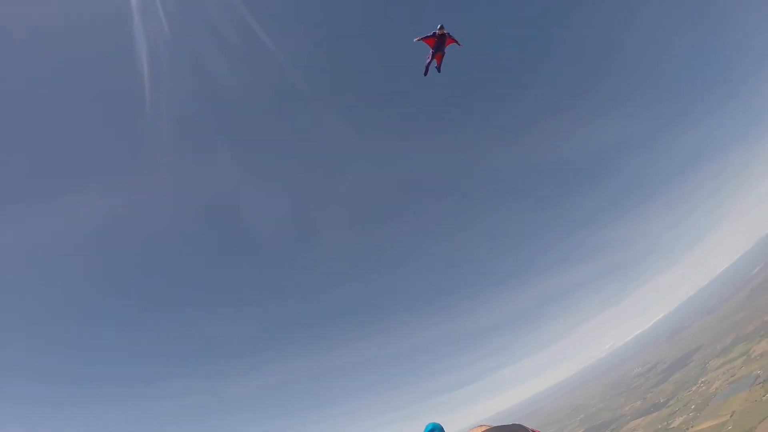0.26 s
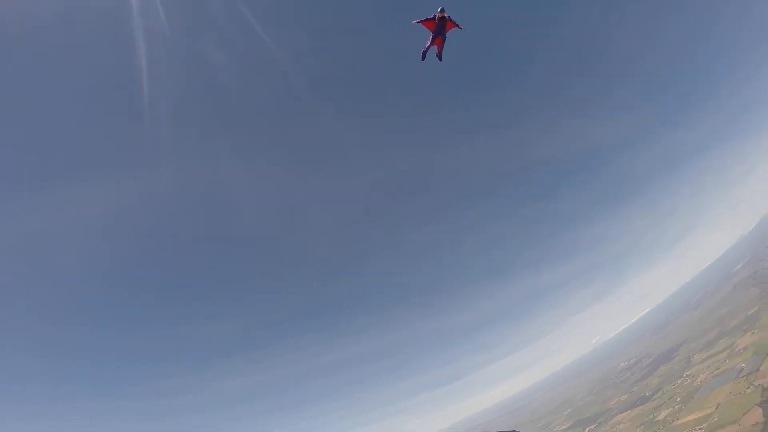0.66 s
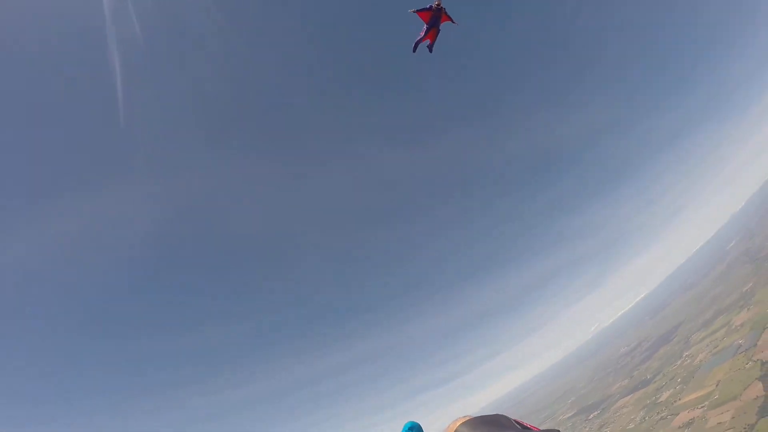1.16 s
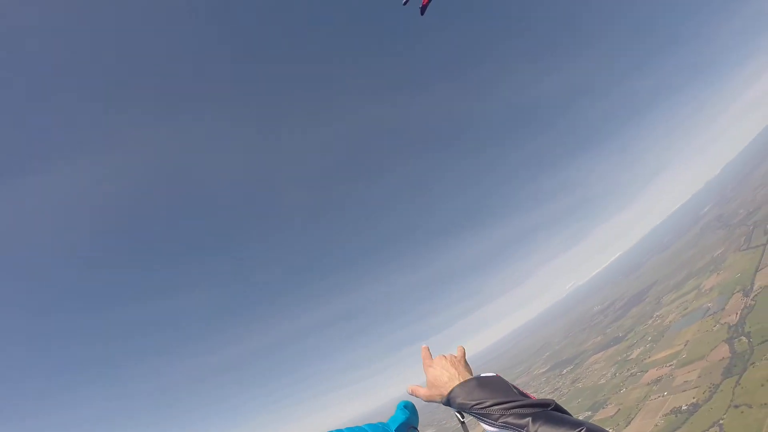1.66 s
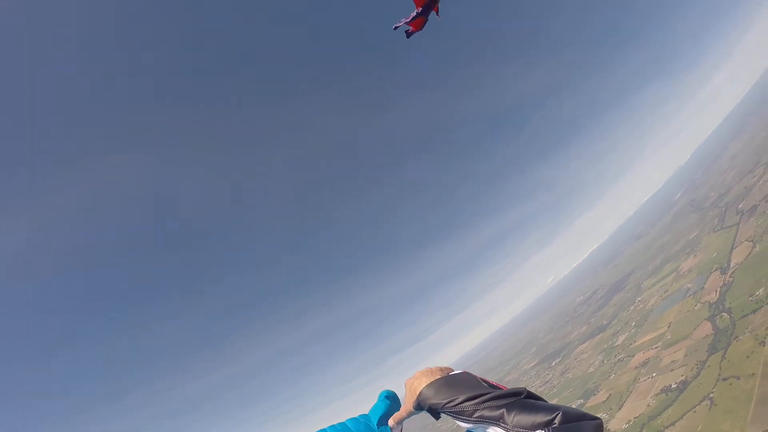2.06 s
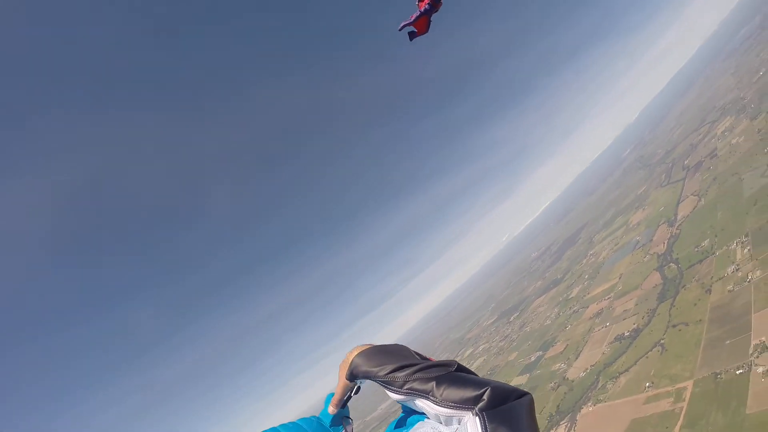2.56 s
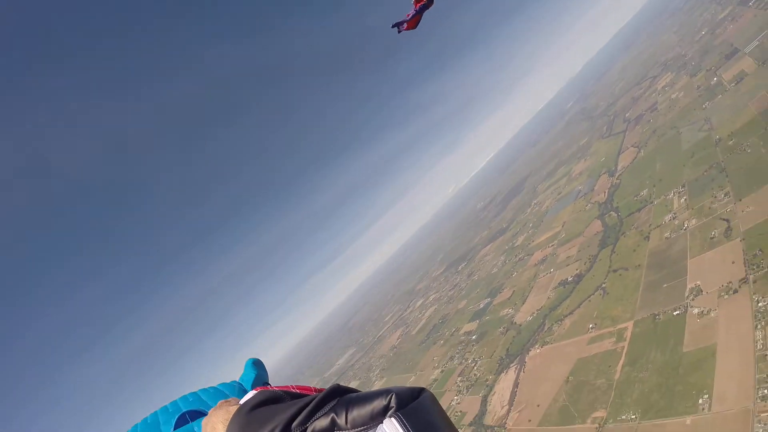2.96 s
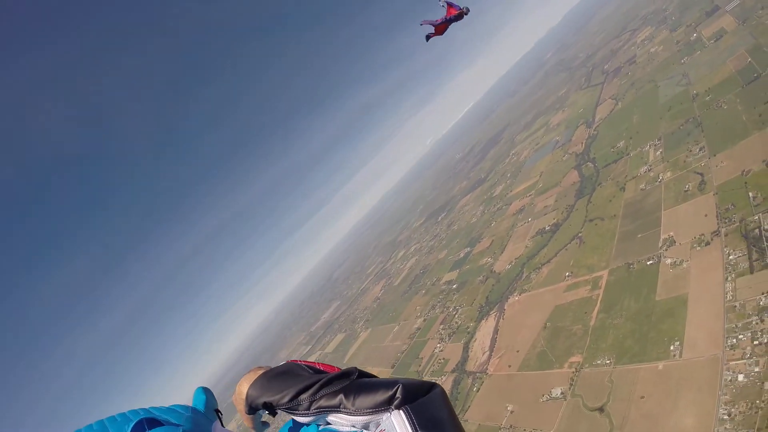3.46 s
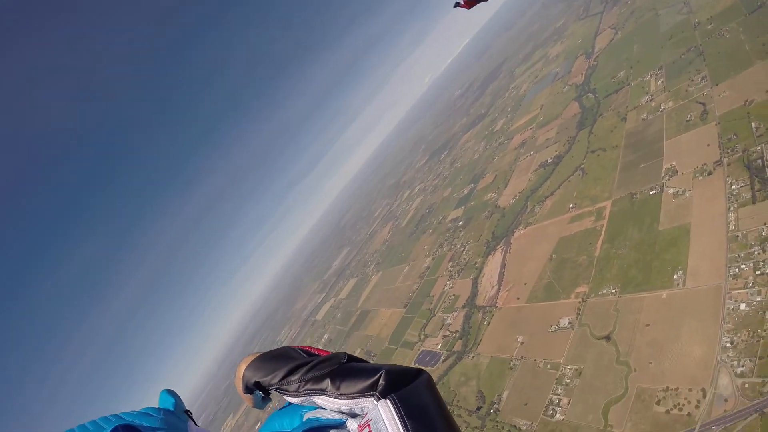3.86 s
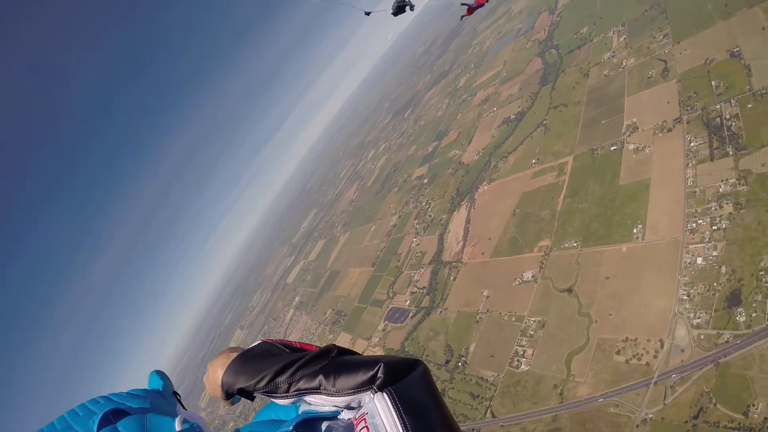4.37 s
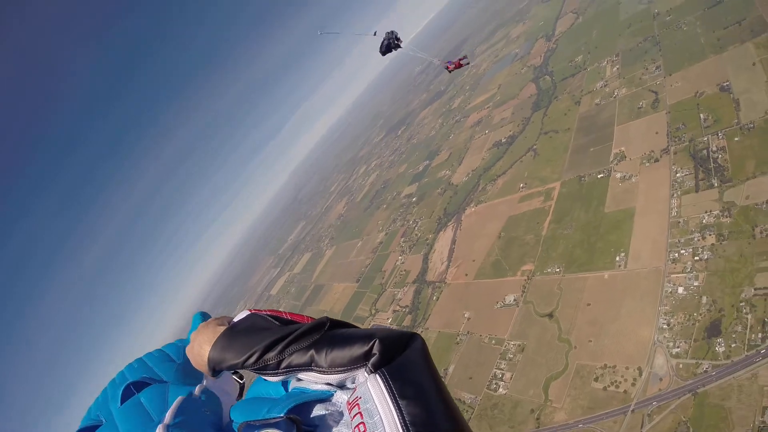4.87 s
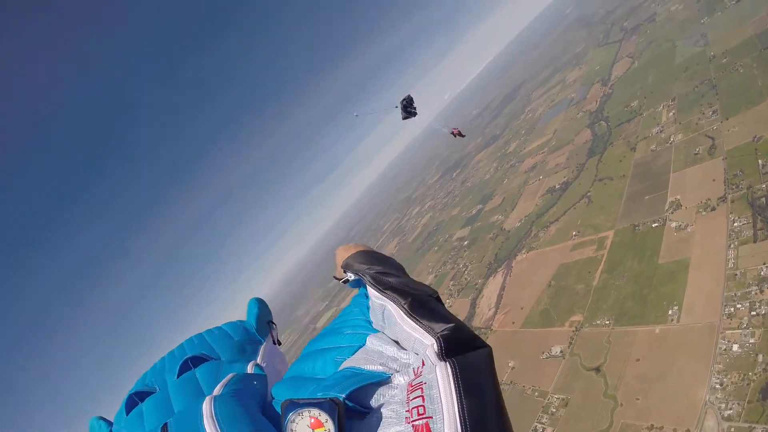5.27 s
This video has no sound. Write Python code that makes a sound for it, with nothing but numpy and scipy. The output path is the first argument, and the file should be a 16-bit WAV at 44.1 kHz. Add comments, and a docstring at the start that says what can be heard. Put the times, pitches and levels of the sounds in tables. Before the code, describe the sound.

Continuous airstream noise from a wingsuit flight, very close and dry, mono, with overloaded peaks squashed. The first two seconds are heavy: low boom, rough crackling flurries, blunt thumps and a steady airy rush. Then the head turns and air catches a gap, adding a strong breathy hiss, hollow at first and then brighter. Low rumble thins out with occasional soft gusts; nothing else is heard.

```python
"""Wingsuit flight heard from a helmet camera. Eddies buffet the housing with a deep boom, a broad rumble and
a fluttering roar, while air rushes over its openings. In the first two seconds the roar breaks into flurries
and big eddies thump, the hardest making the camera's limiter duck for a moment. At 2.1 s, as the head turns,
the airstream catches a gap: a loud, hollow hiss and a thin top from its lip join in while the buffeting eases.
The rush fades from 3 to 4.2 s. Each source is noise shaped by resonances or a broad spectrum, moved in level."""
import sys
import numpy as np
from scipy import signal
from scipy.fft import rfft, irfft
from scipy.io import wavfile
from scipy.ndimage import uniform_filter1d

SR = 44100
rng = np.random.default_rng(int(sys.argv[2]) if len(sys.argv) > 2 else 0)


def wrap_up_sound(samples):
    """Save the sound to the file named by the first command line argument, as 16-bit audio."""
    columns = np.atleast_2d(samples).T
    # keep every value between -1 and 1, then stretch to whole-number steps
    tamed = np.clip(columns, -1, 1)
    steps = np.round(tamed * 32767).astype(np.int16)
    wavfile.write(sys.argv[1], SR, steps)


N = 243381
TIME = np.arange(N) / SR  # s
FREQ = np.maximum(np.arange(N // 2 + 1) * SR / N, 1)  # Hz

# Strength of the buffeting before trim: t/s, deep boom level/dB, broad rumble level/dB
BUFFET_LEVELS = [(0, -18.5, -27.5), (.9, -17, -27.5), (1.1, -14, -29.5), (1.48, -15, -26),
                 (1.7, -17.5, -29), (2.1, -15.5, -29.5), (2.42, -22.5, -31.5), (3.2, -26, -34.5),
                 (3.9, -29, -34), (4.15, -27, -30.5), (4.7, -34, -31.5), (5.52, -25.5, -31)]
# Single gusts and lulls in the deep boom: t/s, level change/dB
BOOM_GUSTS = [(0.97, -8), (1.27, -6), (2.09, 4.5), (2.47, -4), (2.57, 6), (2.81, 7.5), (3.05, 5.5),
              (3.85, -5), (4.42, 9)]
# Big eddies that thump the housing: t/s, peak pressure level/dB ahead of the limiter
THUMP_EVENTS = [(0.2, -3), (1.225, 1.5), (1.532, -1), (1.623, -1), (1.692, -2), (1.884, -4.5)]
# Deep resonances of the buffeted housing: f/Hz, width/Hz, relative level/dB
BOOM_MODES = [(68.6, 27, -10), (84.8, 12.6, 0), (104, 21.3, -2)]
# Resonance of the housing above the deep boom: f/Hz, width/Hz, relative level/dB
UPPER_BOOM_MODES = [(152, 49, 0)]
# Broad spectrum of the rumble: f/Hz, relative level/dB
RUMBLE_SPECTRUM = [(10, -9), (22, 5), (35, 2), (70, 5), (130, 2.5), (205, 4), (260, 0.5), (400, -3.5),
                   (520, -7.5), (700, -10), (1200, -27), (4000, -50)]
# Strength of the midrange roar before trim: t/s, level/dB
ROAR_LEVELS = [(0, -31.0), (0.6, -31), (1.7, -30.5), (3.05, -32.5), (3.12, -37), (3.9, -33.5), (4.3, -29),
               (5.52, -31)]
# Midrange resonances of the buffeted housing: f/Hz, width/Hz, relative level/dB
ROAR_MODES = [(783, 65, -1), (918, 420, -2.5), (1282, 290, -4.5)]
# Short flurries in the roar: t/s, level at the height of the flurry/dB
FLURRY_EVENTS = [(0.11, -25), (0.314, -22), (0.494, -22), (0.589, -16), (0.633, -17.5), (0.792, -22.5),
                 (0.846, -18.5), (1.07, -23), (1.311, -22), (1.511, -20.5)]
# Broad spectrum of a flurry: f/Hz, relative level/dB
FLURRY_SPECTRUM = [(100, -8), (300, -2), (550, -6), (850, 1.5), (1600, -2), (2500, -22), (5000, -34)]
# Air rushing over the housing, before trim: t/s, level/dB
RUSH_LEVELS = [(0, -22), (.9, -19), (1.53, -21), (1.56, -24), (1.8, -21.5), (3, -21.5), (4.2, -36)]
# Air resonances of the housing: f/Hz, width/Hz, relative level/dB driven by the rush, the same by the gap
CAVITY_MODES = [(650, 250, -29, -15.5), (1540, 460, -3, -3.5), (1790, 590, -1.5, -10.5),
                (2402, 500, -1, -6.5), (2700, 350, -0.5, -7), (2987, 296, -2.5, 0), (3310, 565, -2, 1),
                (3840, 1200, -14.5, -36), (4430, 490, -8.5, -14.5), (4587, 154, -21, -8.5),
                (4820, 360, -11, -33), (5260, 240, -12, -21), (5640, 480, -10.5, -16),
                (6060, 300, -15.5, -17.5), (6610, 870, -15.5, -24), (7510, 1020, -12.5, -27),
                (8720, 1120, -15.5, -36), (9640, 910, -16, -25), (10270, 1040, -17.5, -33),
                (11640, 1400, -20, -30), (12440, 920, -19, -27), (14400, 1800, -29, -53)]
# Thin hiss at the lip of the gap: t/s, level/dB
LIP_LEVELS = [(2.12, -60), (2.25, -40), (2.46, -32), (3.04, -33.5), (3.12, -39), (3.85, -38), (4.25, -44)]
# Lowest resonance of the lip: f/Hz, width/Hz, relative level/dB
LIP_LOW_MODES = [(5310, 640, 0)]
# Higher resonances of the lip: f/Hz, width/Hz, relative level/dB
LIP_HIGH_MODES = [(8250, 620, -2), (9680, 620, 1.5), (10170, 500, -1.5), (11200, 1400, -8),
                  (12400, 1000, -10), (14400, 1800, -22)]

CATCH_S = 2.112  # the stream catches the gap


def undb(db):
    """Decibels to gain."""
    return 10 ** (np.asarray(db) / 20)


def curves(table):
    """Each level column of a table as a line through time."""
    times, *columns = np.transpose(table)
    return [np.interp(TIME, times, column) for column in columns]


def resonances(modes):
    """Gain per frequency of a set of steep-sided resonances, summed in power."""
    power = 0
    for hz, width_hz, db in modes:
        detuning = (FREQ - hz ** 2 / FREQ) / width_hz
        power = power + (undb(db) / (1 + detuning ** 2)) ** 2
    return np.sqrt(power)


def spectrum(points):
    """Gain per frequency of a broad spectrum, joined by lines in dB over log frequency."""
    hz, db = np.transpose(points)
    return undb(np.interp(np.log(FREQ), np.log(hz), db))


def turbulence(gain):
    """Random pressure through a frequency response, rms 1."""
    pressure = irfft(rfft(rng.standard_normal(N)) * gain, N)
    return pressure / np.std(pressure)


def walk(rate_hz):
    """Smooth random wander, mostly slower than rate_hz, spread 1."""
    return turbulence(1 / (1 + (FREQ / rate_hz) ** 4))


def sustain(x, span_s):
    """A steady airstream keeps feeding the eddies, so their power evens out over span_s."""
    power = uniform_filter1d(x ** 2, max(int(span_s * SR), 2))
    return x / np.sqrt(power + 1e-9)


def swell(at_s, width_s):
    """A bell-shaped swell in time, peak 1."""
    return np.exp(-0.5 * ((TIME - at_s) / width_s) ** 2)


def buffeting(boom_trim_db=0.74, rumble_trim_db=2.0, gust_width_s=0.035):
    """Shed eddies shake the housing's low resonances over a broad rumble, in random surges."""
    boom_db, rumble_db = curves(BUFFET_LEVELS)
    gust_db = sum(db * swell(at_s, gust_width_s) for at_s, db in BOOM_GUSTS)
    boom = sustain(turbulence(resonances(BOOM_MODES)), span_s=0.093)
    boom = boom * undb(boom_db + gust_db + boom_trim_db)

    # the eddies of boom and rumble both feed the upper boom: mean level in dB, then dB per dB
    upper_db = -29 + 0.48 * (boom_db - boom_db.mean()) + 1.85 * (rumble_db - rumble_db.mean())
    upper = sustain(turbulence(resonances(UPPER_BOOM_MODES)), span_s=0.14) * undb(upper_db)

    rumble = sustain(turbulence(spectrum(RUMBLE_SPECTRUM)), span_s=0.051)
    rumble = rumble * undb(rumble_db + rumble_trim_db + 0.82 * walk(rate_hz=40))

    surge_db = 1.0 * walk(rate_hz=4.2)
    return thumps((boom + upper + rumble) * undb(surge_db))


def thumps(pressure, thump_s=0.002):
    """A big eddy sweeps the small ones aside and passes as suction, pressure peak, suction."""
    for at_s, db in THUMP_EVENTS:
        push = (1 - ((TIME - at_s) / thump_s) ** 2) * swell(at_s, thump_s)
        swept = pressure * (1 - swell(at_s, 2 * thump_s))
        pressure = swept + undb(db) * push
    return pressure


def roar(roar_db, flutter, trim_db=1.5, flurry_width_s=0.0042):
    """Smaller eddies flutter in the midrange and now and then tear off in a broad flurry."""
    steady_db = roar_db + trim_db + 0.6 * flutter + 1.0 * walk(rate_hz=26)
    steady = turbulence(resonances(ROAR_MODES)) * undb(steady_db)
    flurry_gain = sum(undb(db) * swell(at_s, flurry_width_s) for at_s, db in FLURRY_EVENTS)
    return steady + turbulence(spectrum(FLURRY_SPECTRUM)) * flurry_gain


def rush(flutter, trim_db=-3.5):
    """Air over the openings blows the air resonances of the housing, sharing the roar's flutter."""
    level_db, = curves(RUSH_LEVELS)
    hz, width_hz, by_rush_db, _ = np.transpose(CAVITY_MODES)
    hiss = turbulence(resonances(zip(hz, width_hz, by_rush_db)))
    return hiss * undb(level_db + trim_db + 0.82 * flutter)


def gap_jet(roar_db, hollow_hz=2200):
    """The stream across the gap blows the same resonances, favouring the low ones while it grazes."""
    age_s = np.maximum(TIME - CATCH_S, 0)
    onset = 1 - np.exp(-age_s / 0.0078)
    level_db = -15.0 - 6 * np.exp(-age_s / 0.35)  # starts 6 dB short of its full level
    hz, width_hz, _, by_gap_db = np.transpose(CAVITY_MODES)
    jet = turbulence(resonances(zip(hz, width_hz, by_gap_db)))
    jet = jet * onset * undb(level_db) * undb(0.75 * walk(rate_hz=52))

    # change of level below hollow_hz: 9 dB dying away, plus 0.37 dB per dB of roar
    hollow_db = 9 * np.exp(-age_s / 0.19) + 0.37 * (roar_db - roar_db.mean())
    low_part = irfft(rfft(jet) / (1 + (FREQ / hollow_hz) ** 10), N)
    return jet + low_part * (undb(hollow_db) - 1)


def lip():
    """Once the stream has caught the gap, its lip adds a thin top, its lowest resonance lifted by grazing flow."""
    level_db, = curves(LIP_LEVELS)
    graze_db = 4.5 * swell(at_s=2.42, width_s=0.21)
    low = turbulence(resonances(LIP_LOW_MODES)) * undb(-1.5 + graze_db)
    high = turbulence(resonances(LIP_HIGH_MODES))
    return (low + high) * undb(level_db + 1.0 * walk(rate_hz=32)) * (TIME > CATCH_S)


def scene():
    """All the wind at one microphone."""
    roar_db, = curves(ROAR_LEVELS)
    flutter = walk(rate_hz=20)  # shared by roar and rush
    wind = buffeting() + roar(roar_db, flutter) + rush(flutter) + gap_jet(roar_db) + lip()
    return wind[None]


def limiter(x, ceiling_db, release_s):
    """Turns down at once on a peak above the ceiling and recovers gradually."""
    peak = np.abs(uniform_filter1d(x, size=16))
    excess = np.maximum(np.log(peak / undb(ceiling_db) + 1e-9), 1e-9)
    # hold the largest excess so far, each fading exponentially over release_s
    fade = TIME / release_s
    held = np.exp(np.maximum.accumulate(np.log(excess) + fade) - fade)
    return x * np.exp(-uniform_filter1d(held, size=64))


def record(dry):
    """The camera limits the peaks and cuts the top with a steep low-pass."""
    limited = limiter(dry[0], ceiling_db=-4.5, release_s=0.035)
    low_pass = signal.ellip(12, 0.1, 90, 15180, fs=SR, output="sos")  # order, ripple dB, stopband dB, edge Hz
    return signal.sosfilt(low_pass, limited)[None]


dry = scene()
out = record(dry)
wrap_up_sound(out)
```